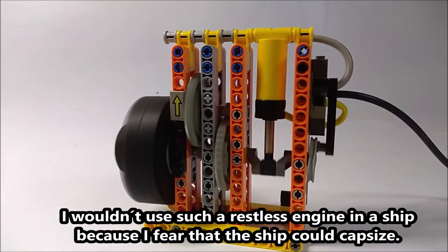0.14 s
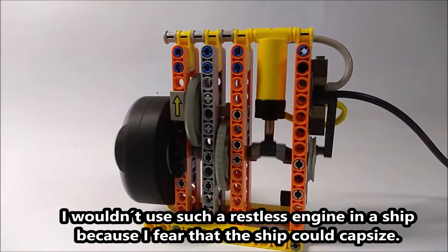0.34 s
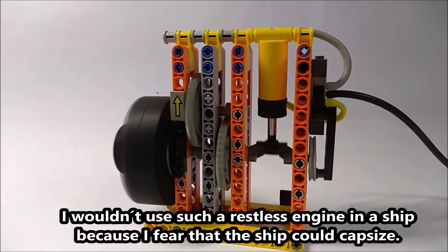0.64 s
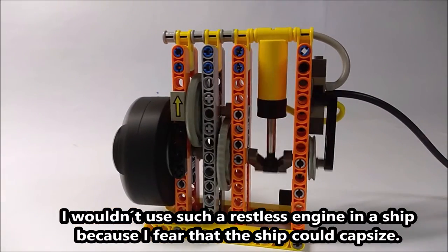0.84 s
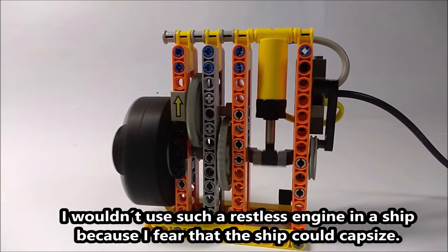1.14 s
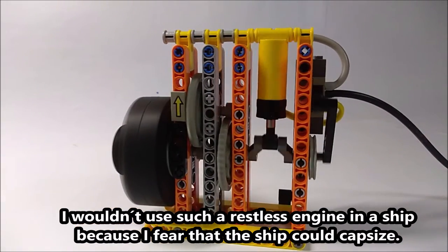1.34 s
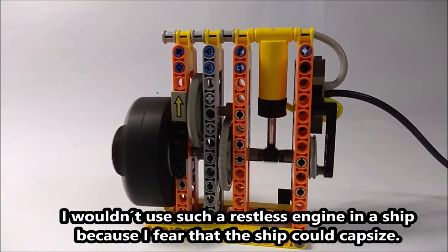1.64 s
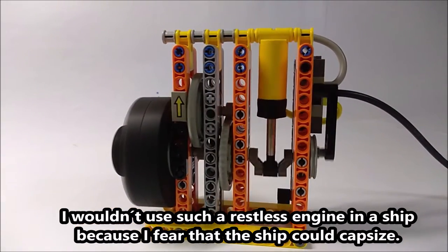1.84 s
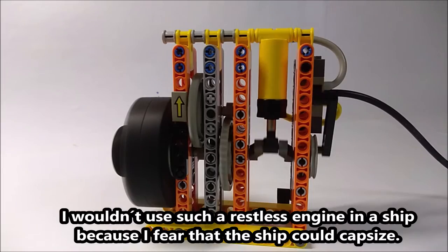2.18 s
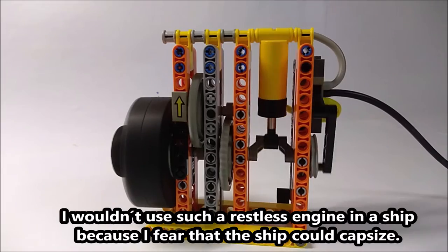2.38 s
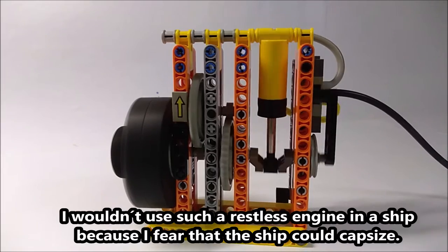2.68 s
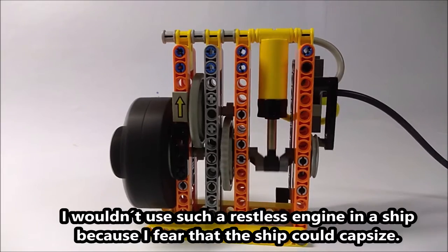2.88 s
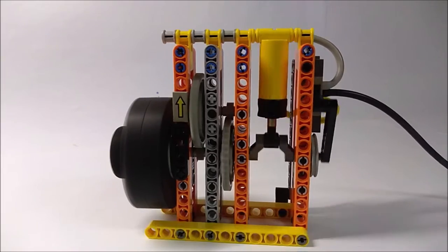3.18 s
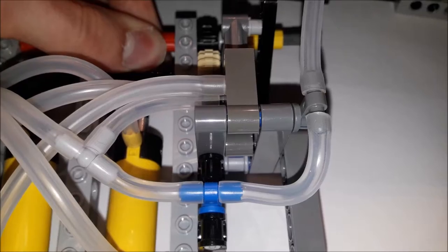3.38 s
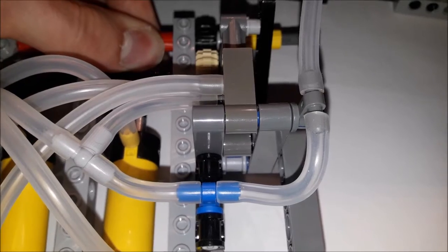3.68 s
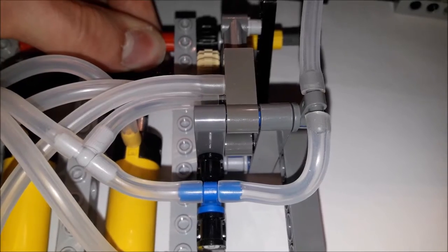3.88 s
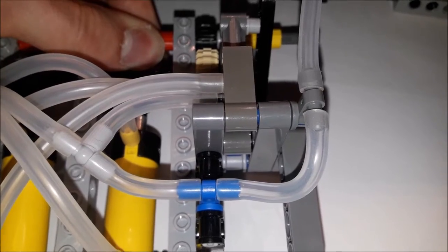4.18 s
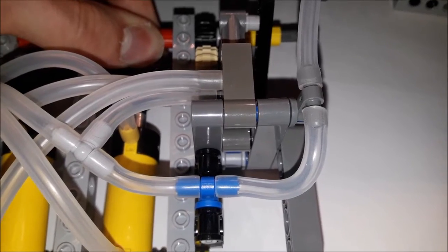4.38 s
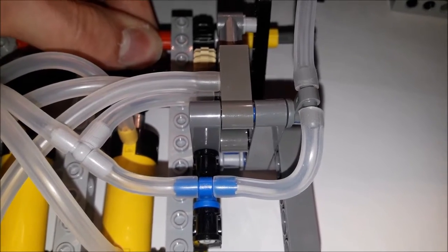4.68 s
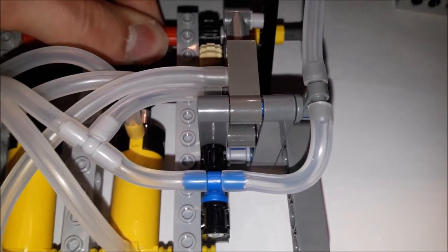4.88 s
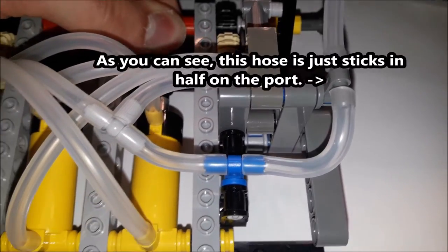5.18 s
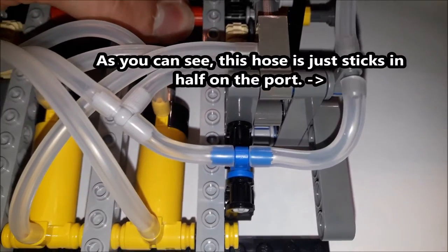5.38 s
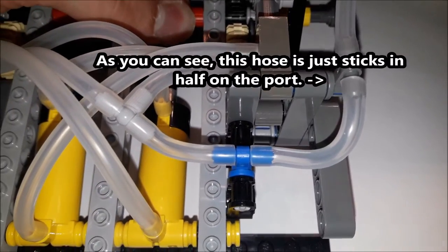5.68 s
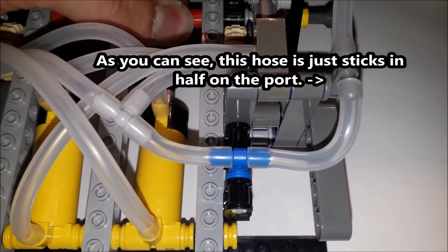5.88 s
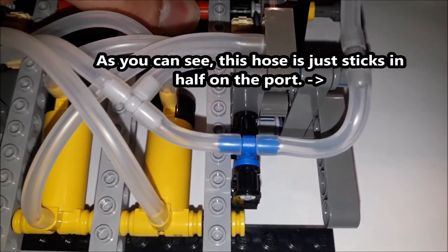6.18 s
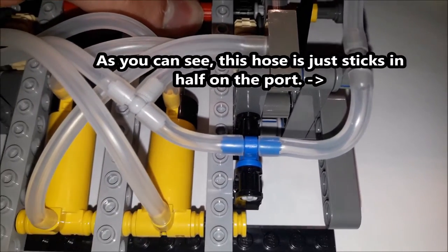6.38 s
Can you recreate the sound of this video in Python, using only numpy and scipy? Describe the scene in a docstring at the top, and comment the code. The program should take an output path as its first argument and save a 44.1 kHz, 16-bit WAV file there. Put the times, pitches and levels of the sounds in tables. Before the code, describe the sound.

From 0 to about 3.3 seconds a small plastic air engine runs slowly on a table, very close and wide in stereo. Each cycle lasts about 0.9 seconds and lets out several soft, fluttering puffs of air over a faint steady hiss. Bright, irregular ticks of loose pins stand out, strongest near 0.9 and 2.8 seconds, with tiny taps, light rattling and dull knocks as the frame rocks. The space is small and dry. At 3.3 seconds it cuts abruptly to a faster, busier, louder machine dead centre. Its rough gear whine rises and sags in every turn, nearly five turns a second, with hard plastic linkage clatter, a low pulsing throb and high air hiss surging from a loose hose. It continues steadily to the end at about 6.7 seconds; from about 5.9 seconds low, lumpy gusts buffet the microphone.

```python
"""Two toy pneumatic engines of plastic bricks run one after the other, close to the microphone.
First a slow single cylinder on a table: shaped noise puffs from its valve, loose pins tick through
ringing filters and the light frame rocks in wide stereo. Then, abruptly, a faster machine dead centre:
gear-mesh partials whine up and down in every turn, the linkage clatters through the chassis and
air hisses from a loose hose; near the end low noise buffets the microphone."""
import sys
import numpy as np
from scipy import signal
from scipy.io import wavfile

SR = 44100
rng = np.random.default_rng(int(sys.argv[2]) if len(sys.argv) > 2 else 0)


def wav_record(signal):
    """Record a signal, one row per channel, as 16-bit PCM in the file named by sys.argv[1]."""
    frames = np.transpose(np.atleast_2d(signal))
    bounded = np.clip(frames, -1, 1)
    # unit amplitude maps onto the largest positive 16-bit level
    quanta = np.round(bounded * 32767).astype(np.int16)
    wavfile.write(sys.argv[1], SR, quanta)


N = 287972
TIME = np.arange(N) / SR  # s

# the change of machine; the band limits of all the sound and of the slow engine
CUT_S = 3.267
EDGE_HZ, SLOW_EDGE_HZ = 15720, 14250
# start of the slow engine's first cycle and the length of each
SLOW_START_S, SLOW_CYCLE_S = -.09, .914
# start of the fast machine's first turn and the length of each
FIRST_TURN_S, TURN_S = 3.2747, .21011


def amp(db):
    """Decibels to gain."""
    return 10 ** (np.asarray(db) / 20)


def evened(x):
    """Scales to unit power."""
    return x / np.sqrt(np.mean(x ** 2) + 1e-20)


def add(mix, s, sound):
    """Mixes a sound in at time s."""
    part = mix[max(round(s * SR), 0):][:len(sound)]
    part += sound[:len(part)]


def noise():
    """White noise of unit power."""
    return rng.standard_normal(N)


def wander(per_s):
    """Random drift of unit power: straight lines between per_s new values a second."""
    return evened(np.interp(TIME * per_s, np.arange(N), noise()))


def body(outline, modes=()):
    """Causal (minimum-phase) impulse response, of unit energy, of an outline with resonances on it."""
    hz = np.abs(np.fft.fftfreq(8192, 1 / SR))
    f, db = np.transpose(outline)
    db = np.interp(np.log(hz + 1), np.log(f), db)
    for centre, width, lift in modes:
        db = db + lift / (1 + (2 * (hz - centre) / width) ** 2)
    # the phase follows from the log magnitude
    spectrum = np.exp(np.conj(signal.hilbert(np.log(amp(db)))))
    ring = np.fft.ifft(spectrum).real[:len(hz) // 2]
    return ring / np.linalg.norm(ring)


def through(x, outline, modes=()):
    """Sounds a drive through a body."""
    return signal.oaconvolve(x, body(outline, modes))[:N]


def rattle(per_s, spread_db, smooth):
    """Random small impacts of uneven size over a share of smooth rubbing."""
    signs = (rng.random(N) < per_s / SR) * rng.choice([-1, 1], N)
    hits = signs * amp(spread_db * np.minimum(rng.exponential(1, N), 3))
    return evened(evened(hits) + smooth * noise())


def low_pass(x, hz):
    """Steep band limit on both channels."""
    taps = signal.firwin(511, hz, window=("kaiser", 9), fs=SR)
    return signal.oaconvolve(x, taps[None], "same")


def room(x, wet_db, t60):
    """Adds dense, quickly dying reflections from the table and the walls."""
    t = TIME[:SR // 2]
    present = (rng.random(len(t)) < .06) * (t > .002)
    taps = rng.standard_normal(len(t)) * present * np.exp(-np.log(1000) * t / t60)
    return x + amp(wet_db) * signal.oaconvolve(x, taps / np.linalg.norm(taps))[:N]


def puff_envelopes():
    """Gains of the rush of air and of its sharper edge; the valve opens alike in every cycle."""
    # air let out in each cycle:
    # (time into the cycle [s], length [s], relative rush level [dB], relative edge level [dB])
    puffs = [(.003, 0.14, -44, -46.5), (0.146, 0.14, -43, -50.5), (0.434, 0.15, -44, -49.5),
             (0.565, 0.087, -42.5, -41.5)]
    rush, edge = np.zeros(N), np.zeros(N)
    cycle_time = (TIME - SLOW_START_S) % SLOW_CYCLE_S
    for start, length, rush_db, edge_db in puffs:
        opening = np.sin(np.pi * np.clip((cycle_time - start) / length, 0, 1))
        rush += amp(rush_db) * opening
        edge += amp(edge_db) * opening ** 2
    return rush, edge


def valve(rush, edge):
    """Turbulent exhaust is fluttering noise over a faint steady hiss; its edge is stronger on the right."""
    # colours of the rush, its edge and the steady hiss: (frequency [Hz], relative level [dB])
    rush_colour = [(300, -27), (2500, -15), (3400, 1.5), (5000, -0.5), (7000, 6.5), (9000, -2.5),
                   (11500, -3.5), (13500, -3), (15000, -2)]
    edge_colour = [(1000, -39), (3000, -18), (4100, 2), (4900, 4), (6000, -0.5), (8000, -9.5), (14000, -8)]
    air_colour = [(30, -11), (200, -27), (1000, -5), (2700, -2), (4200, 5.5), (6600, 6.5), (9000, -1.5),
                  (12000, -14), (15000, -15)]
    flutter = amp(3.5 * wander(180))
    sides = []
    for side_db in (-3, 2.5):  # left, right
        puff = rush * through(noise(), rush_colour)
        puff += amp(side_db) * edge * through(noise(), edge_colour)
        sides.append(flutter * puff + amp(-49.0) * through(noise(), air_colour))
    return np.array(sides)


def stray_strikes():
    """Weak strikes at uneven intervals: rows of (time [s], relative level [dB], frame knock [dB])."""
    per_s, level_db, spread_db, knock_db = 5.7, -32.5, 5, -12.5
    gap, size = rng.random((2, 40))
    times = np.cumsum(gap + .5) / per_s
    return [(s, level_db + spread_db * (2 * u - 1), knock_db) for s, u in zip(times, size) if s < CUT_S]


def pin_strikes(strikes, tick_db=-4, knock_db=-9, chatter_decay=0.016, chatter=0.2,
                knock_decay=0.01, contact_s=0.00085):
    """Each strike is a short contact and a brief chatter of noise; it also shakes the frame."""
    ticks, knocks, t = np.zeros(N), np.zeros(N), TIME[:SR // 20]
    contact = t / contact_s
    tick_shape = contact * np.exp(1 - contact) + chatter * np.exp(-t / chatter_decay)
    knock_shape = np.exp(-t / knock_decay)
    for s, db, frame_db in strikes:
        a, b = rng.standard_normal((2, len(t)))
        add(ticks, s + 0.00044, amp(db + tick_db) * np.tanh(a) * tick_shape)
        add(knocks, s + 0.00073, amp(db + min(frame_db, 0) + knock_db) * b * knock_shape)
    return ticks, knocks


def loose_pins(per_s=150, spread_db=5, pitch_hz=6700, scatter=0.058, decay=0.00053, scrape=0.32):
    """Many faint taps, each with a short, soft-edged ring of its own pitch."""
    taps, t = np.zeros(N), TIME[:SR // 150]
    gaps, sizes, pitches, turns = rng.random((4, 1500))
    grit = rng.standard_normal((len(gaps), len(t)))
    times = np.cumsum(gaps * 2 / per_s)
    for s, size, pitch, turn, rough in zip(times, sizes, pitches, turns, grit):
        hz = pitch_hz * (1 + scatter * (2 * pitch - 1))
        ring = np.sin(2 * np.pi * (hz * t + turn)) + scrape * rough
        add(taps, s, amp(spread_db * 3 * size ** 2) * ring * t / decay * np.exp(-t / decay))
    return evened(taps)


def slow_engine():
    """Loose pins tick and the frame shakes; the frame's rattle swells while the valve's air rushes out."""
    # the loudest strikes of loose pins:
    # (time [s], relative level [dB], frame knock relative to the tick [dB])
    loud_strikes = [(0.0412, -25.5, -13.5), (0.2963, -30.5, -9), (0.4784, -35, -3), (0.5876, -32, -25),
                    (0.6624, -30, -23), (0.7477, -31.5, -5.5), (0.8173, -31, -11), (0.839, -26, -11),
                    (0.8754, -27.5, -13.5), (0.9408, -20.5, -13.5), (1.0284, -26.5, -16), (1.175, -29, -14),
                    (1.1979, -26, -9), (1.3887, -28, -8.5), (1.494, -29.5, -11.5), (1.5708, -32, -9),
                    (1.852, -23, -11.5), (2.2618, -31, -17), (2.3048, -31, -16), (2.4037, -32, -25),
                    (2.4808, -34, -19), (2.6574, -30.5, -12), (2.7596, -20.5, -13.5), (2.9442, -34, -14),
                    (2.993, -32, -21), (3.016, -24.5, -14), (3.2081, -27.5, -15)]
    # outlines of a struck pin, the frame bouncing (alike in both channels) and
    # the frame rocking (opposite in the two): (frequency [Hz], relative level [dB])
    pin = [(300, -33), (1500, -19), (3000, -19), (4200, -1), (5500, -2), (7300, 2), (9000, -5.5),
           (12000, -24), (15000, -31)]
    bounce_outline = [(30, -20), (80, -1.5), (150, -5.5), (300, -6), (550, -4.5), (1000, -0.5),
                      (1300, -10.5), (2500, -8), (4000, -9.5), (9000, -35)]
    rock_outline = [(30, -28), (60, -9), (100, -2.5), (170, -2.5), (350, -0.5), (650, -6.5), (850, -10),
                    (1200, -20.5), (2500, -17.5), (6000, -23.5)]
    # their resonances: (centre [Hz], width [Hz], lift [dB])
    pin_modes = [(4250, 350, 7.1), (6585, 260, 11.6)]
    bounce_modes = [(240, 32, 1.7), (390, 95, 4.2), (520, 54, 7), (785, 83, 13.5), (910, 45, 4.8),
                    (1530, 52, 12.6)]
    rock_modes = [(228.6, 46, 5.2), (453, 68, 4.2), (534, 34, 3.5), (830, 72, 3.5)]

    rush, edge = puff_envelopes()
    rattle_gain = (1 + 0.52 * rush / rush.max()) * amp(2 * wander(70))
    strikes = list(loud_strikes) + stray_strikes()
    ticks, knocks = pin_strikes(strikes)
    # most of the taps are shared by both sides, a fainter share is each side's own
    taps = amp(-52) * loose_pins()
    pins = np.array([through(ticks, pin, pin_modes) + taps + amp(-59.5) * loose_pins() for _ in range(2)])
    bounce_drive = knocks + amp(-56.5) * rattle_gain * rattle(300, 3.1, 0.37)
    bounce = through(bounce_drive, bounce_outline, bounce_modes)
    side_knocks = pin_strikes(strikes)[1]
    rock_drive = amp(4.5) * side_knocks + amp(-48.5) * rattle_gain * rattle(300, 1.8, 0.75)
    rock = through(rock_drive, rock_outline, rock_modes)
    sound = valve(rush, edge) + pins + bounce + np.array([rock, -rock])
    return low_pass(np.array([room(side, wet_db=-7.5, t60=0.039) for side in sound]), SLOW_EDGE_HZ)


def surges(angle, shares, widths, levels_db):
    """Gain of bell-shaped surges that come at the same crank angles in every turn."""
    away = (angle[:, None] - shares + .5) % 1 - .5
    return np.sqrt(np.exp(-(away / widths) ** 2) @ amp(levels_db) ** 2)


def gears(mesh_hz, octaves):
    """Teeth mesh at a rate that rises and sags in every turn; play roughens the note, most when slow."""
    # partials of the gear mesh: (multiple of the mesh rate, relative level [dB])
    mesh = [(1, -8.5), (2, 0.5), (3, -11), (4, -7.5), (5, -13), (6, -7.5), (7, 1.5), (8, 2)]
    # the gear case that radiates the whine: (frequency [Hz], relative level [dB])
    case = [(500, 8), (1500, -2), (2100, 4.5), (2500, -3), (3600, -6), (5500, -1.5), (7000, 3), (8200, -4),
            (9500, -18), (12000, -24)]
    # its resonances: (centre [Hz], width [Hz], lift [dB])
    case_modes = [(1242, 76, 10), (3040, 540, 11), (4790, 640, 8.6)]
    # flutter of the mesh rate (share), which grows as the gears run slack (share per octave)
    play = .018 + 0.0397 * np.maximum(-octaves, 0)
    rate = mesh_hz * (1 + .005 * wander(25) + play * wander(900))
    teeth = np.cumsum(rate) / SR
    whine = np.zeros(N)
    for multiple, db in mesh:
        phase = 2 * np.pi * (round(multiple) * teeth + rng.random())
        whine += amp(db + 3.2 * wander(170)) * np.cos(phase)
    return evened(through(whine, case, case_modes))


def linkage(starts, crack=0.47, uneven_db=2.16, jitter_s=.0005):
    """Rods and valve levers take up their slack at nearly the same points of every turn."""
    # blows in each turn: (share of the turn, relative level [dB], mean pitch [Hz], decay [s])
    turn_blows = [(.137, -15.5, 2030, 0.0014), (0.141, -18.5, 3330, 0.0028), (.175, -19.5, 383, 0.002),
                  (.207, -24.5, 1890, .001), (.378, -20, 1620, 0.0015), (0.386, -16.5, 3200, 0.0026),
                  (.403, -19, 1650, 0.0015), (.422, -30, 700, .002), (.52, -26.5, 356, 0.0028),
                  (0.881, -30, 437, 0.0013), (0.986, -29, 485, 0.0032)]
    blows, t = np.zeros(N), TIME[:SR // 30]
    for start in starts:
        for share, db, hz, decay in turn_blows:
            late, size, pitch = rng.standard_normal(3)
            tone = np.sin(2 * np.pi * hz * (1 + .05 * pitch) * t)
            blow = (tone + crack * rng.standard_normal(len(t))) * np.exp(-t / decay)
            add(blows, start + share * TURN_S + jitter_s * late, amp(db + uneven_db * size) * blow)
    return blows


def throb(octaves):
    """The frame flexes under the piston's load, faster as the machine speeds up."""
    usual_hz, hz_per_octave = 113.7, 27
    cycles = np.cumsum((usual_hz + hz_per_octave * octaves) * (1 + .03 * wander(40))) / SR
    return amp(0.91 * wander(20)) * np.sin(2 * np.pi * cycles)


def fast_machine():
    """The crank angle drives gear whine, clatter, throb and the pulsing leak of air."""
    # speed of the gears within a turn: (share of the turn, mean mesh rate [Hz])
    speed = [(0, 952.5), (.11, 1073), (.17, 1047), (.39, 1048), (.45, 1187), (.53, 1228), (.6, 1177),
             (.76, 866), (.88, 747.2), (1, 951.2)]
    # the pistons load the mechanism: (share of the turn, half width [share of the turn],
    # relative whine level [dB], relative rattle level [dB], relative throb level [dB])
    pushes = [(.06, 0.067, -32, -35, -41.5), (.18, 0.05, -39, -26.5, -52), (.27, 0.058, -29, -31.5, -43),
              (.41, .045, -52, -27.5, -37.5), (.53, .04, -28, -33, -36.5), (.86, 0.059, -35, -38, -43)]
    # air escapes from the loose hose:
    # (share of the turn, half width [share of the turn], relative hiss level [dB])
    exhausts = [(.15, 0.039, -32), (.46, .04, -28.5), (.62, .075, -25)]
    # outlines of the clattering chassis and the leaking air: (frequency [Hz], relative level [dB])
    chassis = [(30, -33), (62, -30), (90, -3.5), (170, -6), (330, -2.5), (750, 0.5), (950, -1.5),
               (1500, 1.5), (2200, 1), (2750, -4), (3700, -6.5), (4700, -3), (7000, -5.5), (11000, -25)]
    leak_colour = [(1000, -31), (3700, -21), (4600, -4), (5500, -12), (6300, -0.5), (7050, 1.5), (7700, -4),
                   (8700, -13), (9350, -9), (10000, -21), (11000, -27), (12500, -43), (16000, -45)]
    # resonances of the chassis: (centre [Hz], width [Hz], lift [dB])
    chassis_modes = [(216, 21, 7.5), (294.6, 28, 8), (378.4, 55, 12.5), (421, 12, -11.5), (459, 19, 9),
                     (570, 56, 7), (734, 51, 4.5), (1262, 58, 3.5)]

    starts = np.arange(FIRST_TURN_S, N / SR, TURN_S)
    angle = (TIME - FIRST_TURN_S) / TURN_S % 1  # share of the turn
    mesh_hz = np.interp(angle, *np.transpose(speed))
    octaves = np.log2(mesh_hz / 1050)  # above the usual mesh rate in Hz
    share, width, whine_db, rattle_db, throb_db = np.transpose(pushes)
    # levels between the surges rise with speed (dB per octave)
    whine = np.hypot(amp(-33 + 3 * octaves), surges(angle, share, width, whine_db))
    shake = np.hypot(amp(-33.5 + 11 * octaves), surges(angle, share, width, rattle_db))
    hiss = np.hypot(amp(-29 + 3.5 * octaves), surges(angle, *np.transpose(exhausts)))
    # the same flaws in the teeth come round again in every turn
    flaws = rattle(900, 3.6, 0.65)[(angle * TURN_S * SR).astype(int)]
    shaking = shake * (0.78 * rattle(1100, 3.8, 0.74) + 0.57 * flaws)
    clatter = through(shaking + amp(-8.5) * linkage(starts), chassis, chassis_modes)
    leak = hiss * amp(1.0 * wander(300)) * through(rattle(2500, 2.9, 1.0), leak_colour)
    flex = surges(angle, share, width, throb_db) * throb(octaves)
    return room(whine * gears(mesh_hz, octaves) + clatter + leak, wet_db=-12, t60=0.19) + flex


def buffeting():
    """Low, lumpy gusts at the microphone: softly clipped low noise that swells and sinks."""
    # strength of the gusts: (time [s], level [dB])
    gusts = [(5.84, -49), (5.934, -33), (5.974, -38), (6.15, -28.5), (6.264, -29.5), (6.292, -51),
             (6.338, -32), (6.386, -44), (6.52, -48)]
    # their colour: (frequency [Hz], relative level [dB])
    gust_colour = [(20, -35), (45, -13), (80, -1), (160, 0), (240, -11.5), (400, -24.5), (1500, -51)]
    s, db = np.transpose(gusts)
    gain = amp(np.interp(TIME, s, db, left=-120))
    return gain * evened(np.tanh(through(noise(), gust_colour)))


def scene():
    """The slow engine in wide stereo, then the fast machine dead centre."""
    switch = np.clip((TIME - CUT_S) / .002, 0, 1)  # a 2 ms crossfade
    return (1 - switch) * slow_engine() + switch * (fast_machine() + buffeting())


def record(dry):
    """The recorder's band limit."""
    return low_pass(dry, EDGE_HZ)


dry = scene()
out = record(dry)
wav_record(out)
```